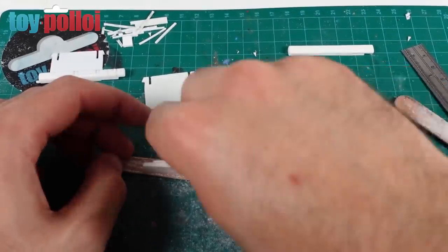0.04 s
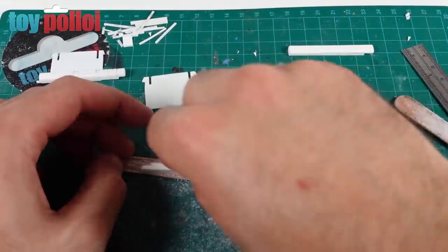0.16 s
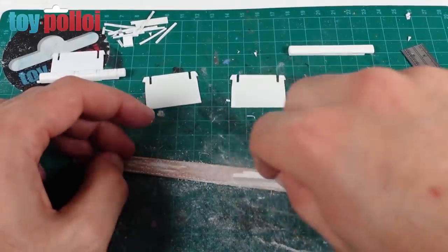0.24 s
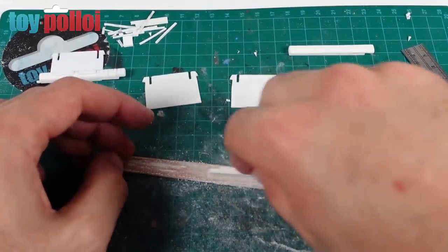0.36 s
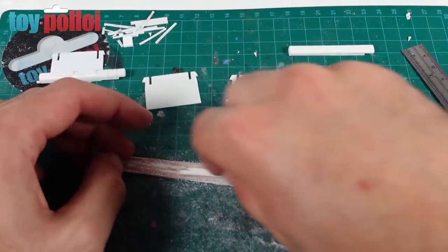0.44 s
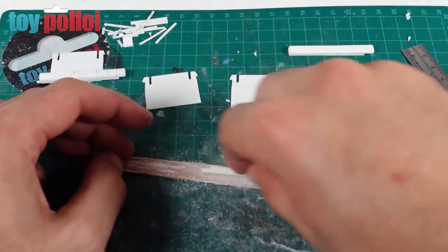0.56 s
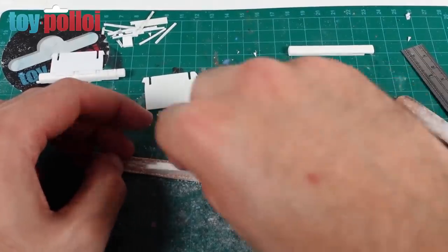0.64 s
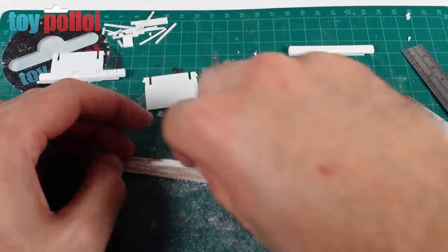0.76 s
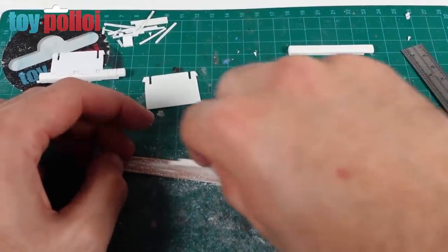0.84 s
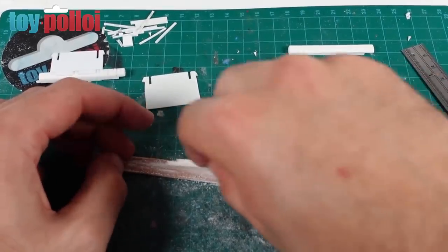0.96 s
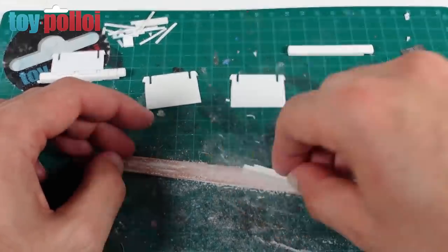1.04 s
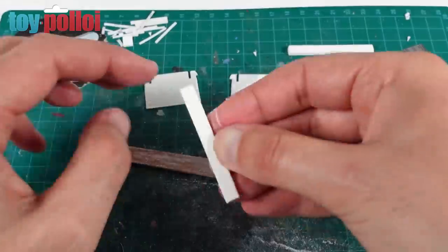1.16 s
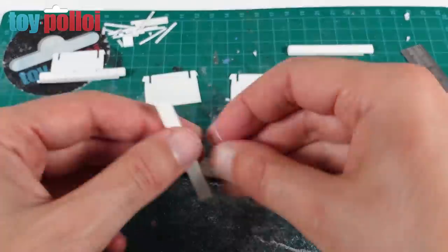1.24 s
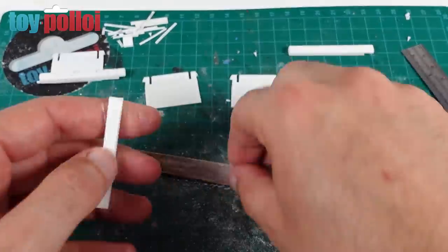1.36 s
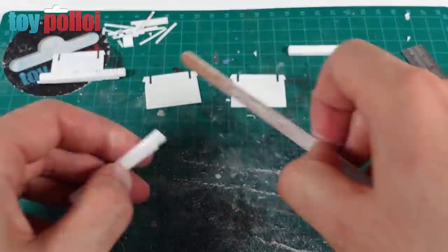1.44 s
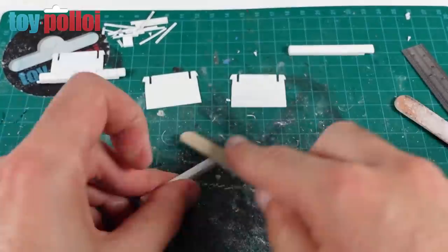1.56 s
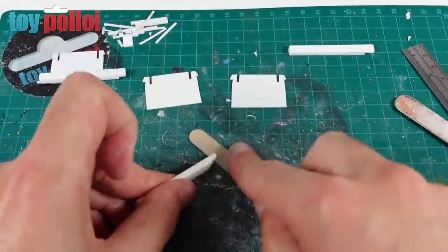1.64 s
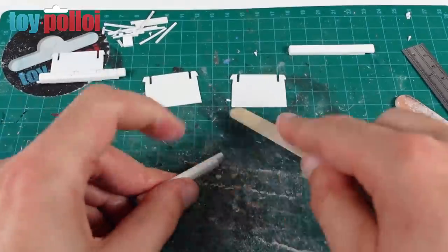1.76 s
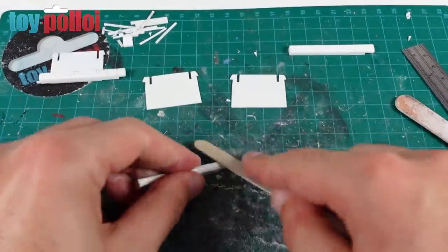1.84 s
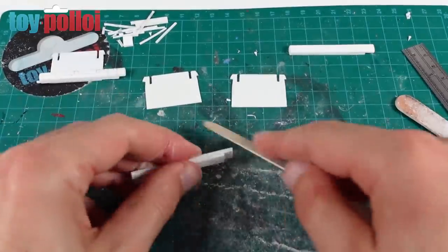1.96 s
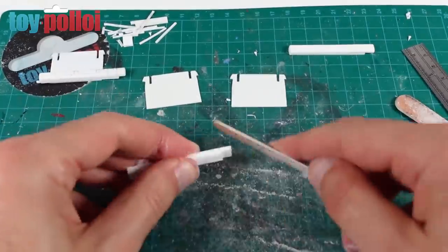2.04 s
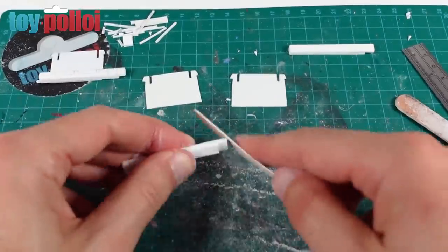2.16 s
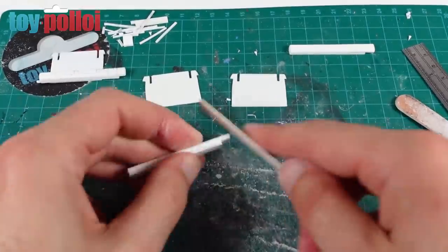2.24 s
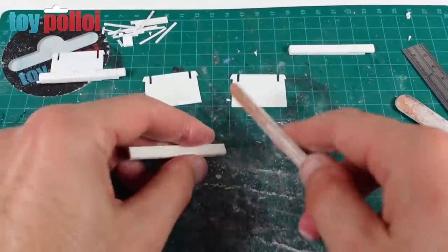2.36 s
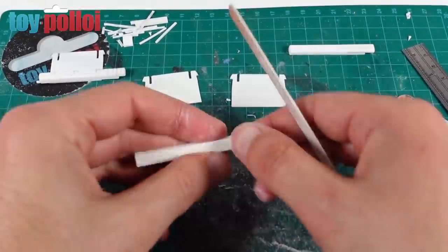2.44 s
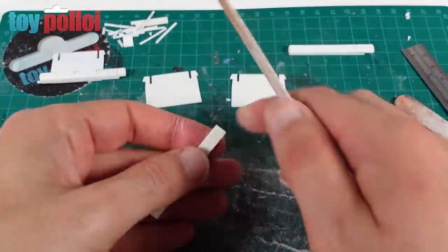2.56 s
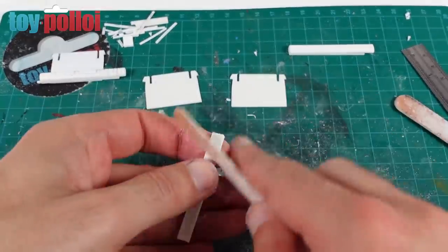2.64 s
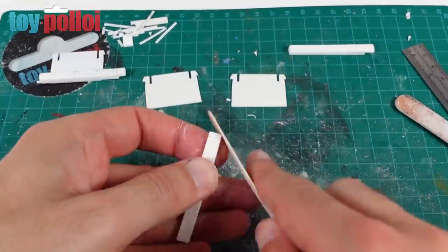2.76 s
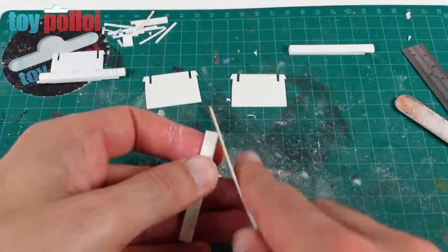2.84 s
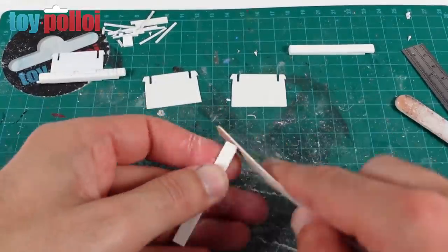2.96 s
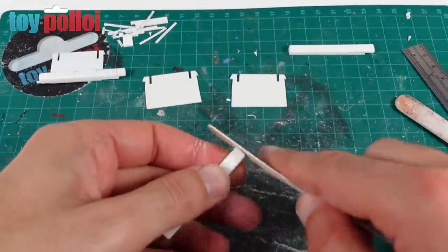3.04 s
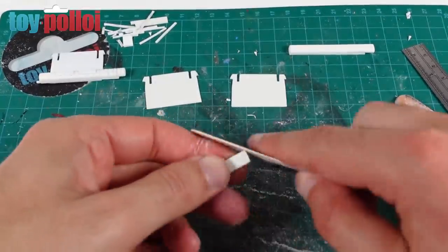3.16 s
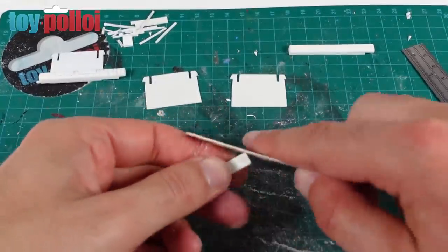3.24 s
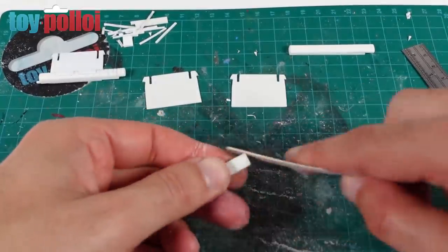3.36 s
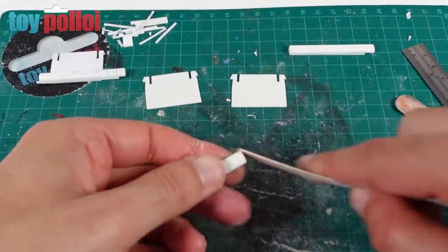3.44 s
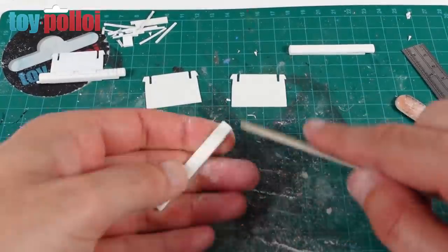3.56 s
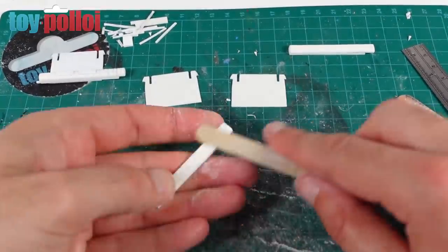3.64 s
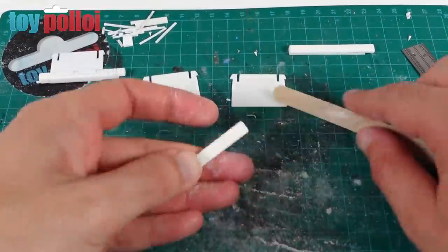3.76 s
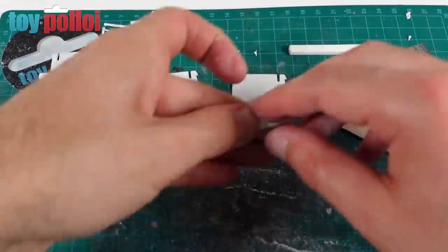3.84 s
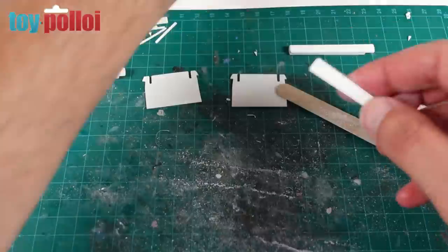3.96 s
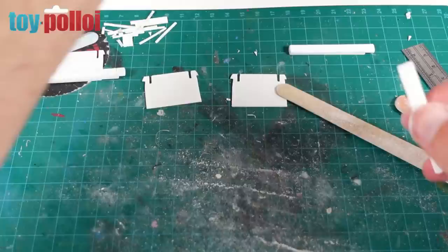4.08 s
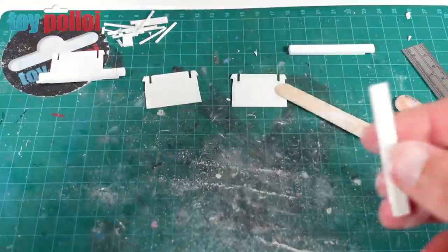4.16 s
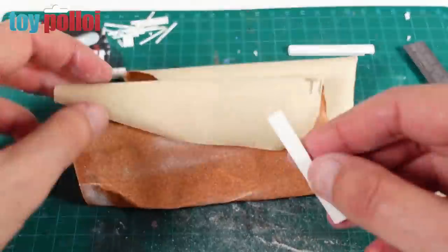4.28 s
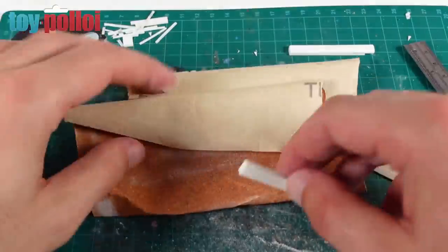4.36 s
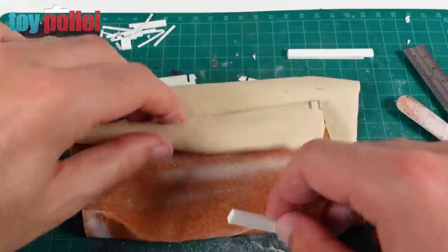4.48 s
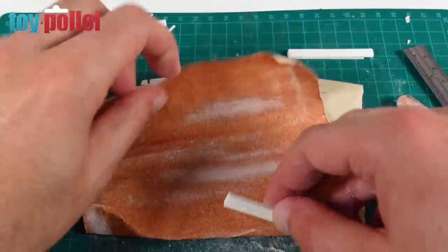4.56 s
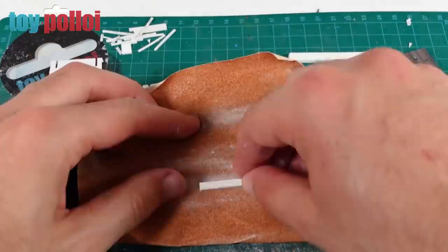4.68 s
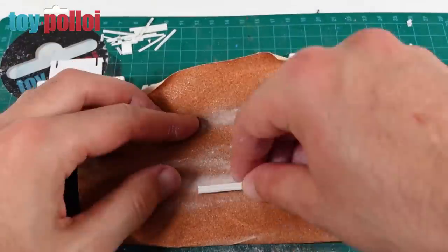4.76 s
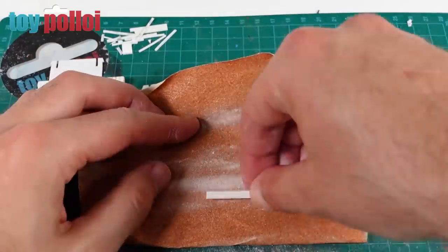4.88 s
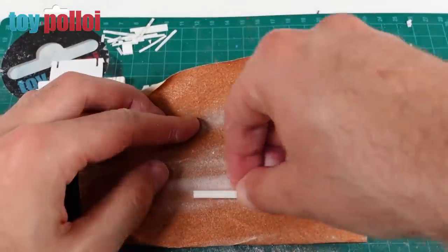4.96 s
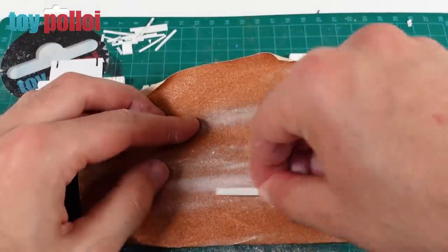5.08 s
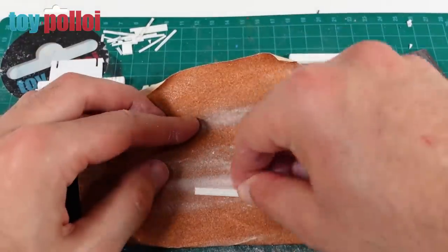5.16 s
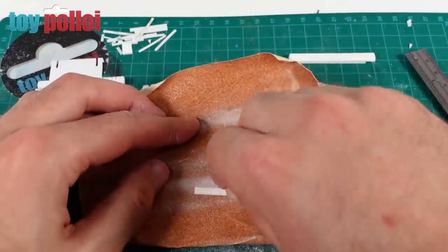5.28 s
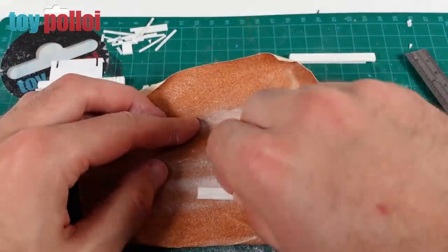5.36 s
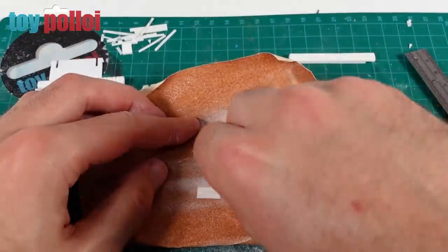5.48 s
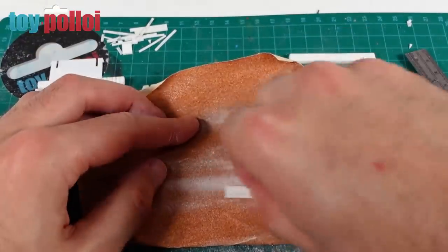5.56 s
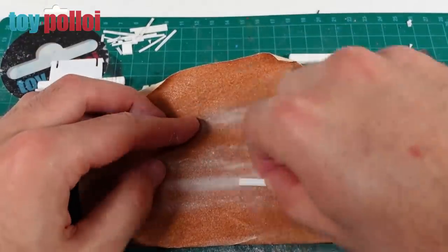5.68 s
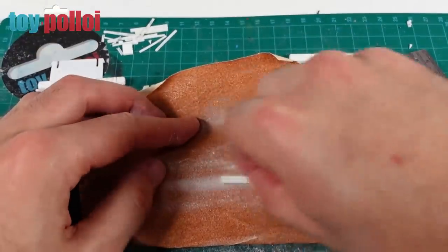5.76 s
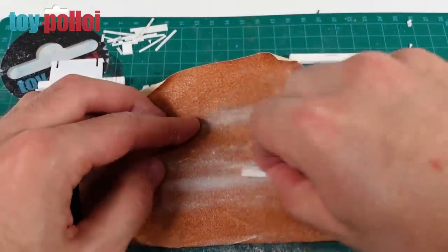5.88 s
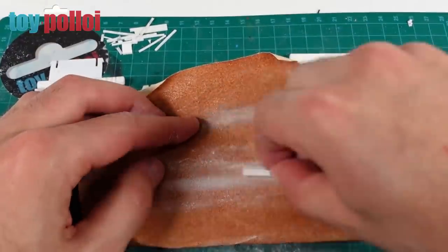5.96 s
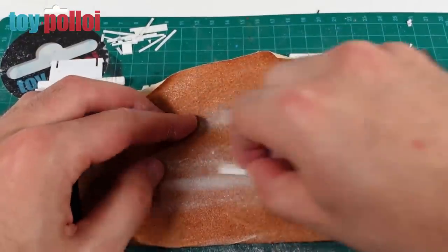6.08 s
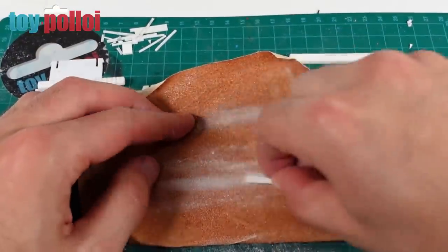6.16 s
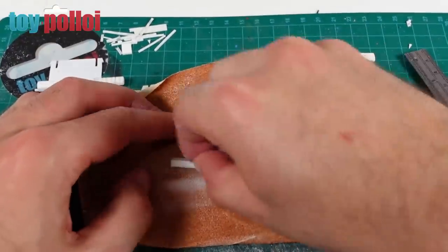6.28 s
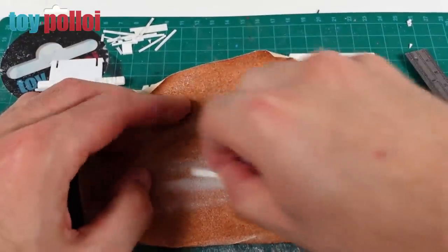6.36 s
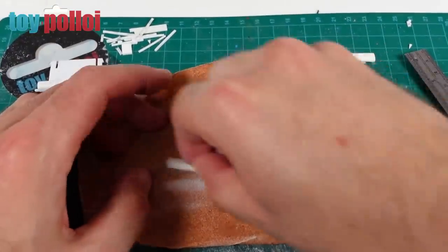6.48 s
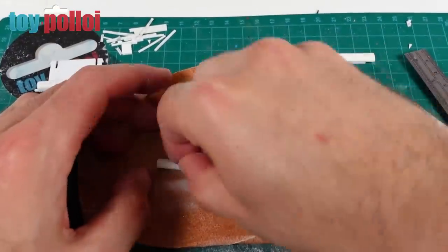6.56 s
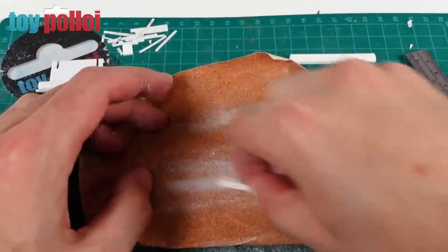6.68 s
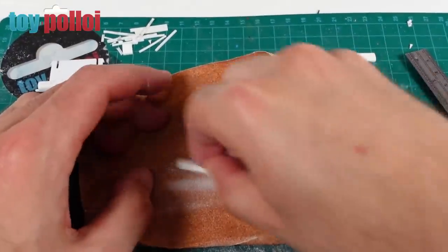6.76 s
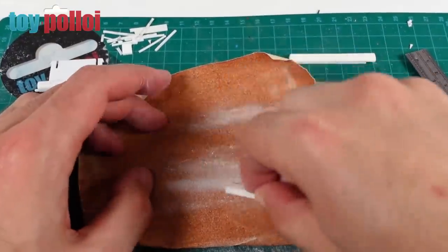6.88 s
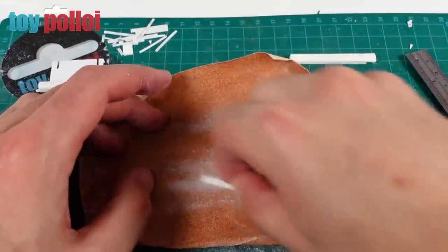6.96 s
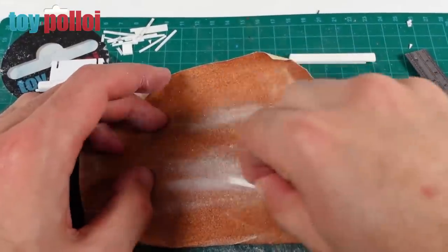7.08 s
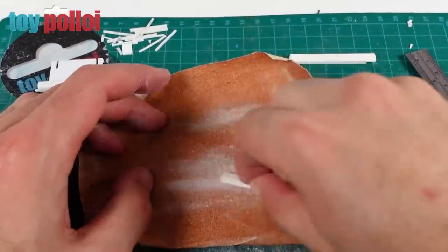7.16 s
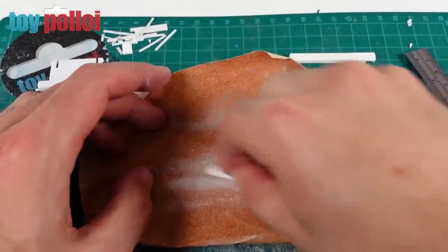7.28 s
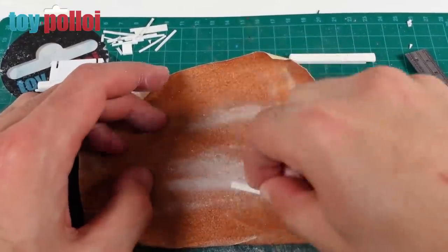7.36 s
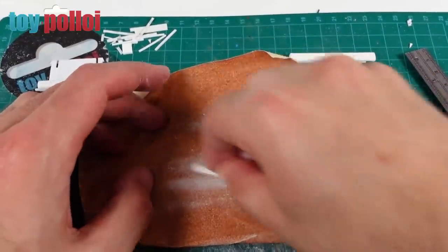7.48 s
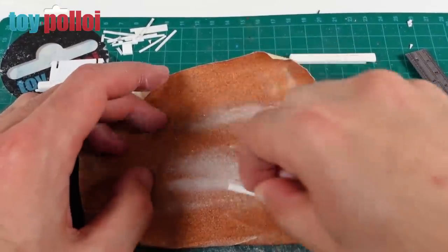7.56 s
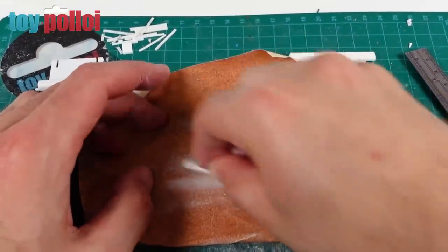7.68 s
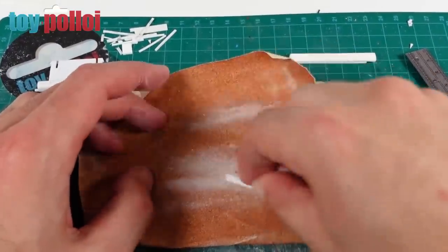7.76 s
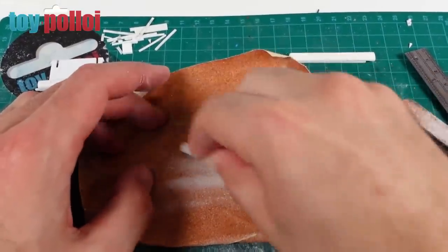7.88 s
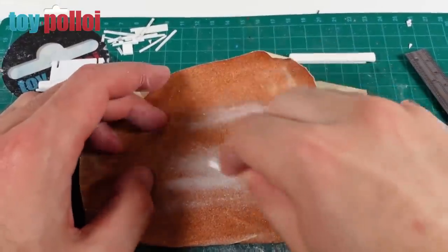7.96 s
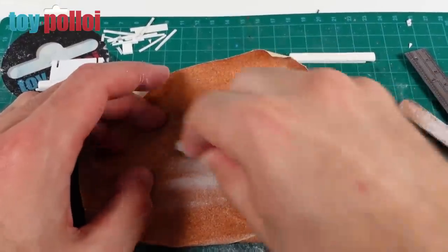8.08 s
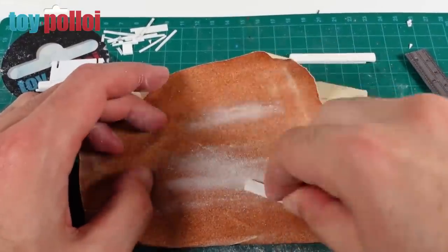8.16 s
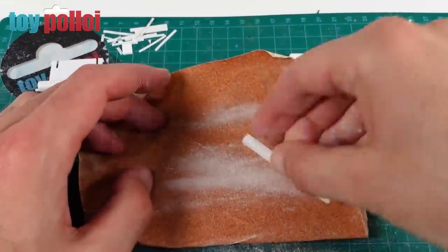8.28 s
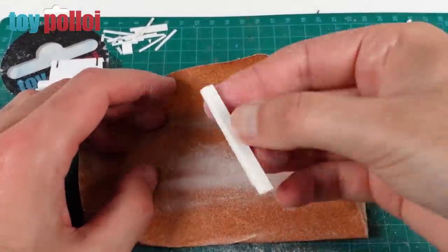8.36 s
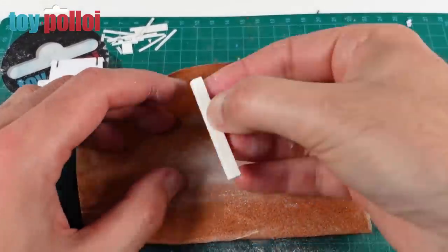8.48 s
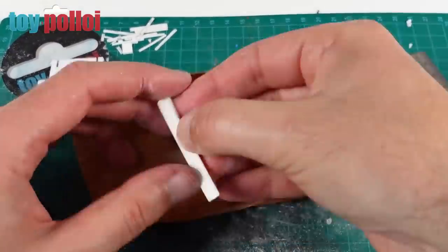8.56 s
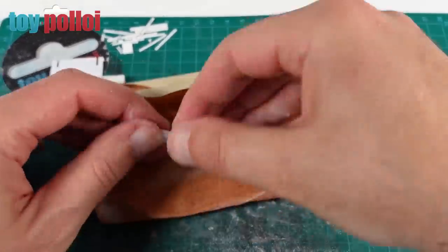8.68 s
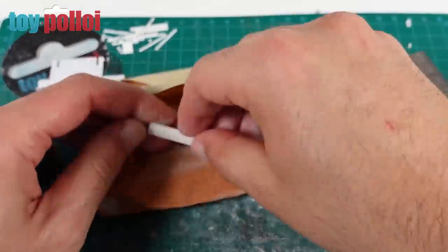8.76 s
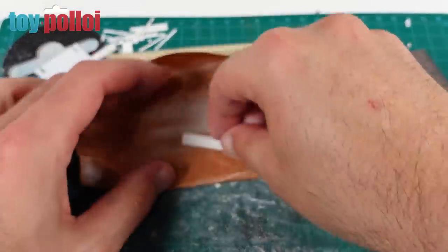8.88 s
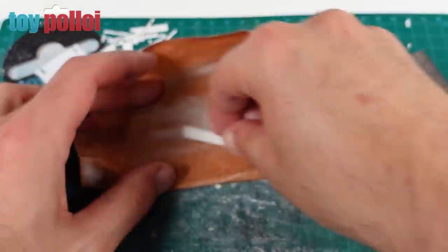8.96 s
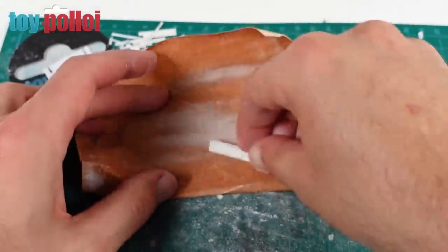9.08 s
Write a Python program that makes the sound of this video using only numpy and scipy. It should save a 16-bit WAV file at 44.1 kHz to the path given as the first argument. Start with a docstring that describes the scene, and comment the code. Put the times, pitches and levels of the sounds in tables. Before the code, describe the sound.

Quick dry sanding rasps, faint nail-file scratches and ticks, snaps of stiff sandpaper, then a long rapid gritty scrubbing in a small room.

```python
"""Small plastic strips are scrubbed on sandpaper by hand, close to the microphone, in a small room.
Before that a strip is rubbed on a sanding stick and trimmed with a nail file.
Every stroke is a hail of tiny grit impacts that follows the hand's speed, coloured by filters.
Pieces and tools tick as they meet and the stiff sheet snaps: short blows, each with a brief ring.
Fingers shift their grip, the file rings when knocked, and faint rumble, hiss and low tones lie behind."""
import sys
import numpy as np
from scipy import signal
from scipy.fft import rfft, irfft
from scipy.io import wavfile

SR = 44100
rng = np.random.default_rng(int(sys.argv[2]) if len(sys.argv) > 2 else 0)


def wrap_up_sound(samples):
    """Save the sound to the file named by the first command line argument, as 16-bit audio."""
    columns = np.atleast_2d(samples).T
    # keep every value between -1 and 1, then stretch to whole-number steps
    tamed = np.clip(columns, -1, 1)
    steps = np.round(tamed * 32767).astype(np.int16)
    wavfile.write(sys.argv[1], SR, steps)


N = 402633  # length of the scene [samples]

# The hand on the sandpaper: a few trial strokes, the long scrub, a fresh start after a look at the edge:
# (time [s], tempo [strokes/s], level [dB], extra bass from pressure [dB], extra treble from speed [dB])
PAPER_TRIAL_HAND = [(4.867, 15, -42, 4, -2), (5.06, 19.7, -33.5, -0.5, 4), (5.19, 22, -35, -0.5, 1.5)]
PAPER_SCRUB_HAND = [(5.575, 18.9, -37.5, -1.5, 6), (5.65, 19.55, -31.3, -0.5, 5), (5.8, 20.95, -31, -1, 2),
                    (6.15, 21.7, -26.3, -3, 0.5), (6.33, 21.9, -27.2, 0, 2.5), (6.52, 22.1, -24.8, -1, 2),
                    (6.66, 22.05, -27.2, 2.5, 3), (7.1, 21.1, -26.4, 1.5, 1.5), (7.6, 20.25, -28.3, 1.8, 2),
                    (8.0, 20.3, -28.2, 0.5, -1.5), (8.2, 19.7, -26.8, 0.5, 2.5)]
PAPER_RESUME_HAND = [(8.925, 18.8, -35, 3.7, 5.4), (9.13, 19.8, -29.5, 5.4, 5.2)]
# the strip skids as it is set down on the sandpaper:
# (time [s], length [s], level [dB], extra bass [dB], extra treble [dB])
PAPER_LANDING_STROKES = [(4.8089, 0.028, -29.5, -4, 1.3), (8.815, 0.036, -26, -4.5, 0.85)]
# colour of rubbing on sandpaper: (frequency [Hz], level [dB])
PAPER_COLOUR = [(50.0, -6), (150.0, -7), (350.0, -9.5), (700.0, -5), (1100.0, -10.5), (1900.0, -3.5),
                (2900.0, -3.5), (4200.0, 0), (5600.0, 0.5), (7500.0, 2), (9500.0, -2.5), (12000.0, -0.7),
                (15500.0, 0)]


def sandpaper():
    """The strip is scrubbed on sandpaper, whose dense grit strikes it all through each stroke."""
    strokes = to_and_fro(PAPER_TRIAL_HAND, contact=0.94)
    strokes += to_and_fro(PAPER_SCRUB_HAND, contact=0.98, lean_db=2.5, settle_s=1.4)
    strokes += to_and_fro(PAPER_RESUME_HAND, contact=0.99)
    strokes += PAPER_LANDING_STROKES
    return rub(strokes, PAPER_COLOUR, ring=1, breakaway=0.12, moving=0.94, sharpness=0.99,
               snags_per_s=1500, snag_db=4, chatter_db=1.87, shift_db=3, rest_db=-28.5)


# The hand with the strip on the flat sanding stick:
# (time [s], tempo [strokes/s], level [dB], extra bass from pressure [dB], extra treble from speed [dB])
STICK_HAND = [(-0.026, 16.7, -39.5, 0.5, 3.5), (0.25, 15.6, -40.5, 2, 5.5), (0.58, 18.3, -40, 3, 4.5),
              (0.75, 18.8, -38, 2, 0.5), (0.95, 17.6, -40.5, 0, 3), (1.09, 13.9, -40, 0, 0)]
# colour of rubbing on the stick: (frequency [Hz], level [dB])
STICK_COLOUR = [(50.0, -2), (150.0, -11.5), (350.0, -9), (700.0, -11), (1100.0, -14.5), (1900.0, -6),
                (2900.0, -8.5), (4200.0, -4.5), (5600.0, -6), (7500.0, -4.5), (9500.0, -6.5), (12000.0, -5),
                (15500.0, -0.5)]


def sanding_stick():
    """The strip is rubbed to and fro on fine grit glued to a flat stick."""
    strokes = to_and_fro(STICK_HAND, contact=0.96, lean_db=1.5, settle_s=0.088)
    return rub(strokes, STICK_COLOUR, ring=0.99, breakaway=0.27, moving=0.93, sharpness=1.,
               snags_per_s=1800, snag_db=4.5, chatter_db=-1.0, shift_db=3, rest_db=-42)


# The hand with the nail file on the hand-held strip, in slow strokes:
# (time [s], tempo [strokes/s], level [dB], extra bass from pressure [dB], extra treble from speed [dB])
FILE_SLOW_HAND = [(1.412, 9.3, -39.5, -2.5, -9), (1.53, 11.15, -50.5, -7, 9), (1.7, 11.9, -53.5, 12.5, 7),
                  (1.87, 11.4, -46, 5, -5), (1.96, 11.6, -46, -1, 4.5), (2.2, 10.6, -48.5, 0, 5),
                  (2.4, 7.8, -56, 7, -5)]


def slow_file_strokes():
    """Slow strokes of the file, with a lift between them."""
    return to_and_fro(FILE_SLOW_HAND, contact=0.38)


# The same hand in quick, light strokes:
# (time [s], tempo [strokes/s], level [dB], extra bass from pressure [dB], extra treble from speed [dB])
FILE_QUICK_HAND = [(2.772, 24, -40.5, -6, -0.98), (2.83, 23.5, -53.5, -8, -1.01), (2.95, 18.5, -44, -2, 1),
                   (3.1, 27, -52, 0, -1.03), (3.27, 23.5, -51.5, 0, 0), (3.5, 23.5, -46, -7, -1)]
# stray touches of the file: (time [s], length [s], level [dB], extra bass [dB], extra treble [dB])
FILE_TOUCH_STROKES = [(1.633, 0.039, -50.5, 8, 6), (2.587, 0.033, -50.5, 2.5, -5),
                      (3.666, 0.067, -56.5, -10, 9), (3.728, 0.038, -48, -23, 6)]
# colour of filing: (frequency [Hz], level [dB])
FILE_COLOUR = [(50.0, 8), (150.0, -21), (350.0, -8), (700.0, -0.5), (1100.0, -4), (1900.0, 3),
               (2900.0, -3.5), (4200.0, -2), (5600.0, -1.5), (7500.0, -1), (9500.0, -2), (12000.0, -1.5),
               (15500.0, -1)]


def nail_file(slow_strokes):
    """The file trims the strip; its few strong snags make a rougher sound."""
    strokes = slow_strokes + to_and_fro(FILE_QUICK_HAND, contact=0.96) + FILE_TOUCH_STROKES
    return rub(strokes, FILE_COLOUR, ring=0.45, breakaway=0.032, moving=0.84, sharpness=0.86,
               snags_per_s=1200, snag_db=14, chatter_db=1.7, shift_db=0.5, rest_db=-26)


# the sheet sliding over the mat and under the fingers:
# (time [s], length [s], level [dB], extra bass [dB], extra treble [dB])
SHEET_STROKES = [(4.04, 0.09, -40.5, -0.5, 0), (4.15, 0.032, -52.5, 6, 6), (4.245, 0.09, -34, 4, 3),
                 (4.355, 0.24, -40, -1, 1), (4.483, 0.044, -25.5, -6, 1), (4.56, 0.174, -35.5, 1, 4.5),
                 (4.625, 0.073, -28, -1.5, 3.5), (8.2, 0.11, -54.5, 9, 3), (8.37, 0.15, -46.5, 3.5, -3),
                 (8.525, 0.097, -44, 2, 6), (8.675, 0.1, -47.5, -1, 0), (8.785, 0.19, -36.5, 1.5, 1)]
# colour of the sliding sheet: (frequency [Hz], level [dB])
SHEET_COLOUR = [(50.0, -34), (150.0, -34), (350.0, -20), (700.0, -4.5), (1100.0, -10), (1900.0, -2.5),
                (2900.0, -7.5), (4200.0, -6), (5600.0, 0.5), (7500.0, -5), (9500.0, -9.5), (12000.0, -12),
                (15500.0, -8.5)]


def sliding_sheet():
    """The sheet of sandpaper is pulled into place, with sparse, strong snags."""
    return rub(SHEET_STROKES, SHEET_COLOUR, ring=0.094, breakaway=0.086, moving=0.88, sharpness=0.4,
               snags_per_s=350, snag_db=16, chatter_db=4.5, shift_db=3.0, rest_db=-10)


# resonances of the strip, hand and worktop: (frequency [Hz], width [Hz], height [dB])
BODY_RESONANCES = [(219, 73, 6.5), (441, 44, 7.5), (582.4, 30, 10.5), (850, 73, 6), (1167, 214, 7),
                   (1552, 233, 9), (2170, 530, 6), (3310, 36, 4), (3920, 20, 2), (5680, 1030, 3),
                   (7180, 116, 2.2), (8200, 363, 3), (11080, 1800, 4.5)]


def rub(strokes, tone, ring, breakaway, moving, sharpness, snags_per_s, snag_db, chatter_db, shift_db, rest_db):
    """Each stroke breaks away, speeds up and slows to the turn; the treble needs the most speed."""
    hz, out = bins(), np.zeros(N)
    colour_db = read(tone, hz)
    for centre_hz, width_hz, height_db in BODY_RESONANCES:
        colour_db = colour_db + ring * height_db / (1 + (2 * (hz - centre_hz) / width_hz) ** 2)
    for s, length, db, bass_db, treble_db in strokes:
        bands = split(grit(snags_per_s, snag_db, chatter_db))
        size = min(round(length * SR), len(bands[0]))
        phase = np.linspace(0, 1, size)
        # half a sine wave, entered partway up; the hand may stop before the stroke ends
        travel = breakaway + (1 - breakaway) * phase / min(moving, 1)
        speed = abs(np.sin(np.pi * np.minimum(travel, 1)))
        drive = np.zeros(size)
        for band, extra_db, power in zip(bands, (bass_db, 0, treble_db), (.55, 1, 1.2)):
            swell = unit(speed ** abs(power * sharpness) + amp(rest_db))
            drive += amp(extra_db) * band[:size] * swell
        drive /= np.std(sum(bands)[:size])
        # the contact point travels along the strip, so the colour changes from end to end of the stroke
        for weight in (1 - phase, phase):
            body = causal(colour_db + shift_db * wander(len(hz), 45.3))
            add(out, s, amp(db) * signal.fftconvolve(drive * weight, body))
        add(out, s, amp(db) * unit(speed) * squeaks(size / SR))
    return out


def to_and_fro(hand, contact, lean_db=0, settle_s=1, uneven_db=0.7):
    """Strokes touch for a share of each beat; as the hand settles in, pushes bear down and pulls ease off."""
    times, tempo, *controls = np.transpose(hand)
    t = np.linspace(times[0], times[-1], SR)
    beats = np.cumsum(np.interp(t, times, tempo)) * (t[1] - t[0])
    turns = np.maximum(np.interp(np.arange(round(beats[-1]) + 1), beats, t), 0)
    strokes = []
    for k, (s, beat_s) in enumerate(zip(turns, np.diff(turns))):
        length = contact * beat_s
        planned = [np.interp(s + length / 2, times, control) for control in controls]
        db, bass_db, treble_db = planned + uneven_db * rng.standard_normal(3)
        settled = min(((s - times[0]) / settle_s) ** 2, 1)
        push_db = (-1) ** k * lean_db * settled
        strokes.append((s, length, db, bass_db + push_db, treble_db))
    return strokes


def grit(snags_per_s, snag_db, chatter_db, chatter_hz=450, size=8192):
    """Countless fine impacts, a few coarse grains that snag, and a chattering contact."""
    fine = rng.standard_normal(size)
    is_snag = rng.random(size) < snags_per_s / SR
    snags = is_snag * np.clip(rng.laplace(size=size), -3, 3)
    chatter = amp(chatter_db * wander(size, chatter_hz * size / SR))
    return (fine + amp(snag_db) * snags) * chatter


def squeaks(length, squeak_db=-7, low_hz=2200, high_hz=7500, cycles=4, count=5):
    """Here and there a coarse grain sticks and slips for a few cycles, each at a pitch of its own."""
    out, t = np.zeros(round(length * SR)), np.arange(SR // 50) / SR
    for when, pitch, force in rng.random((count, 3)):
        turns = t * low_hz * (high_hz / low_hz) ** pitch
        squeak = np.sin(2 * np.pi * turns) * np.exp(-turns / cycles)
        add(out, when * length, 2 * force ** 2 * squeak)
    return amp(squeak_db) * out


# an edge of the strip catches and lets go with a bright tick: (time [s], energy [dB])
CATCH_TICKS = [(1.595, -16), (1.7409, -12), (1.7752, 1), (2.2209, -8), (3.818, -2), (3.8449, -3.5),
               (4.8167, -2), (4.938, -3), (4.9557, 0), (5.051, 0), (5.2133, -14.5), (7.2292, 1.5),
               (8.8345, 3.5), (8.995, 3)]
CATCH_HZ, CATCH_OCTAVES = 15300, 1.2  # centre and spread


def strip_catches():
    """A caught edge springs free with a bright tick."""
    blows = [(s, db, CATCH_HZ, CATCH_OCTAVES) for s, db in CATCH_TICKS]
    return clicks(blows, ring_share=0.75, ring_t60=0.039, crush_s=0.0006)


# strip, file and fingers knock together: (time [s], energy [dB], centre [Hz], spread [octaves])
TAP_BLOWS = [(1.1464, -18.5, 1610, 1.15), (1.6562, -2.5, 7720, 2.1), (1.8734, -13.5, 1650, 0.15),
             (1.9331, -12.5, 559, 1.46), (1.9698, -9.5, 3030, 1.7), (2.3009, -13, 7540, 0.42),
             (2.3556, -17.5, 5780, 1.23), (2.9819, -6.5, 1730, 1.13), (3.5586, -17, 2157, 1),
             (3.981, -21.5, 940, 0.79), (4.091, -1.5, 2050, 1.14), (5.3755, -13.5, 2280, 3.1),
             (8.2258, -8.5, 3500, 0.68), (8.2753, 2, 5240, 0.81), (8.4222, -11.5, 1800, 0.46),
             (8.5944, -10, 1900, 1.4)]


def taps():
    """Strip, file and fingers knock together, each tap with a colour of its own."""
    return clicks(TAP_BLOWS, ring_share=0.71, ring_t60=0.038, crush_s=0.001)


# the strip trips over a coarse grain of the sandpaper: (time [s], energy [dB], centre [Hz])
TRIP_BLOWS = [(6.4079, 0.5, 5850), (6.768, 3.5, 4300), (6.8056, 5, 5600)]
TRIP_OCTAVES = 0.44  # spread


def strip_trips():
    """A coarse grain jolts the strip: mostly blow, little ring."""
    blows = [(*row, TRIP_OCTAVES) for row in TRIP_BLOWS]
    return clicks(blows, ring_share=0.33, ring_t60=0.038, crush_s=0.0004)


# the loose pieces tick lightly between the fingers:
# (time [s], length [s], energy of the strongest ticks [dB])
FIDGET_STRETCHES = [(1.08, 0.35, -23), (2.25, 0.53, -20), (3.1, 0.6, -22.5)]


def light_ticks(slow_strokes, lead_s=0.01, landing_db=-18, landing_hz=2200, landing_octaves=4.3):
    """Loose pieces tick, and the file lands with a soft tap just before each slow stroke."""
    landings = [(s - lead_s, landing_db, landing_hz, landing_octaves) for s, *_ in slow_strokes]
    ticks = scatter(FIDGET_STRETCHES, ticks_per_s=16, range_db=15, centre_hz=4500, octaves=2.6)
    return clicks(landings + ticks, ring_share=0.65, ring_t60=0.022, crush_s=0.00032)


# the stiff sheet snaps as it bends: (time [s], energy [dB], centre [Hz])
SNAP_BLOWS = [(4.239, 6, 2750), (4.2806, -4.7, 2990), (4.4909, 0, 5830), (4.505, 5, 4500),
              (4.5614, -4, 4400), (4.6006, -2, 1200), (4.668, -3, 4680), (8.1488, -4, 1900),
              (8.8947, -6, 4460)]
SNAP_OCTAVES = 0.64  # spread
# the handled sheet crinkles: (time [s], length [s], energy of the strongest ticks [dB])
CRINKLE_STRETCHES = [(4.3, 0.15, -11.5), (8.405, 0.04, -12), (8.86, 0.06, -7)]


def sheet_clicks():
    """The bending sheet gives loud snaps, and small ticks while it crinkles."""
    snaps = [(*row, SNAP_OCTAVES) for row in SNAP_BLOWS]
    crinkles = scatter(CRINKLE_STRETCHES, ticks_per_s=55, range_db=11.5, centre_hz=2190, octaves=1.15)
    return clicks(snaps + crinkles, ring_share=0.66, ring_t60=0.03, crush_s=0.0007)


def clicks(blows, ring_share, ring_t60, crush_s, ripple_db=3, size=2048):
    """A sharp, slightly crumbling blow, then a short dense ring of the light plastic or stiff paper."""
    hz, t, out = bins(), np.arange(size) / SR, np.zeros(N)
    share = np.clip(ring_share, 0, 1)
    for s, db, centre_hz, spread in blows:
        # a bell-shaped hump over octaves, its skirts held at -35 dB
        octaves_away = np.log2((hz + 1) / centre_hz)
        hump_db = np.maximum(-10 / np.log(100) * (octaves_away / spread) ** 2, -35)
        body = causal(hump_db + ripple_db * wander(len(hz), 31.4))
        crush = (t == 0) + .5 * rng.standard_normal(size) * np.exp(-t / crush_s)
        rattle = rng.standard_normal(size) * amp(-60 * t / ring_t60)
        blow = unit(signal.fftconvolve(crush, body)[:size])
        ring = unit(signal.fftconvolve(rattle, body)[:size])
        click = np.sqrt(1 - share) * blow + np.sqrt(share) * ring
        add(out, s, amp(db) * click / np.sqrt(size))
    return out


def scatter(stretches, ticks_per_s, range_db, centre_hz, octaves):
    """Small blows of random time and strength, spread over each stretch."""
    blows = []
    for s, length, db in stretches:
        ticks = rng.random((max(round(ticks_per_s * length), 1), 2))
        for k, (when, weakness) in enumerate(ticks):
            time = s + length * (k + when) / len(ticks)
            blows.append((time, db - range_db * weakness, centre_hz, octaves))
    return blows


# hard knocks on the nail file: (time [s], level [dB])
KNOCKS = [(2.982, -31), (4.092, -36)]
# ringing tones of the nail file: (frequency [Hz], level [dB], time to fade by 60 dB [s])
FILE_RING = [(903, -5.5, 0.077), (1185, -5.5, 0.065), (4430, -5, 0.053), (5110, 7, 0.019)]


def file_knocks():
    """The nail file rings briefly when knocked, as a few fading sine tones."""
    t, out = np.arange(SR // 5) / SR, np.zeros(N)
    ring = sum(amp(db - 60 * t / t60) * np.sin(2 * np.pi * hz * t) for hz, db, t60 in FILE_RING)
    for s, db in KNOCKS:
        add(out, s, amp(db) * ring)
    return out


# fingers shifting their grip on the strip: (time [s], length [s], level [dB])
GRIP_SHIFTS = [(1.06, 0.16, -55), (1.335, 0.12, -55.5), (2.421, 0.26, -65.5), (5.196, 0.37, -59.5)]


def fingers(ticks_per_s=200, tick_db=23, skin_hz=2000, slope_db=5):
    """Dry skin creeps over the plastic in small dull ticks while the grip changes."""
    out = np.zeros(N)
    skin = causal(-slope_db * abs(np.log2((bins() + 1) / skin_hz)))
    for s, length, db in GRIP_SHIFTS:
        creep = grit(ticks_per_s, tick_db, 8.4, chatter_hz=63.4, size=SR)[:round(length * SR)]
        creep = unit(creep * signal.windows.tukey(len(creep), .5))
        add(out, s, amp(db) * signal.fftconvolve(creep, skin))
    return out


def room(x, early_db=-13, tail_db=-21, early_t60=0.041, tail_t60=0.19):
    """Quick scatter from the worktop and hands, then the faint tail of a small room."""
    t = np.arange(SR // 2) / SR
    response = 1. * (t == 0)
    for db, t60, delay in ((early_db, early_t60, .002), (tail_db, tail_t60, .012)):
        echoes = rng.standard_normal(len(t)) * (rng.random(len(t)) < .1)
        echoes = echoes * (t > delay) * amp(-60 * t / t60)
        response = response + amp(db) * echoes / np.linalg.norm(echoes)
    return signal.fftconvolve(x, response / np.linalg.norm(response))[:N]


# colour of the room noise: (frequency [Hz], level [dB])
FLOOR_COLOUR = [(35, -0.5), (200, -1.5), (330, -6), (800, -6), (1700, -10), (3200, -15.5), (6000, -17.5),
                (10000, -20), (15500, -18)]
FLOOR_DB = -54  # level of the room noise
# faint low tones in the background: (time [s], length [s], frequency [Hz], level [dB])
FAINT_TONES = [(3.06, 0.1895, 111, -57), (3.05, 0.55, 186, -60.5), (3.74, 0.22, 188, -54.5)]


def background():
    """Steady rumble and hiss from filtered noise, with a few faint low tones that swell and fade."""
    spectrum = rfft(rng.standard_normal(N)) * amp(read(FLOOR_COLOUR, bins(size=N)))
    out = amp(FLOOR_DB) * unit(irfft(spectrum, N))
    for s, length, hz, db in FAINT_TONES:
        t = np.arange(round(length * SR)) / SR
        swell = np.sin(np.pi * t / length)
        add(out, s, amp(db) * swell * np.sin(2 * np.pi * hz * t))
    return out


def amp(db):
    """Decibels to gain."""
    return 10 ** (np.asarray(db) / 20)


def unit(x):
    """Scales to an rms of one."""
    return x / np.sqrt(np.mean(x ** 2) + 1e-20)


def read(points, hz):
    """Reads a spectrum table on a log-frequency axis."""
    f, value = np.transpose(points)
    return np.interp(np.log(hz + 1), np.log(f + 1), value)


def add(mix, s, sound):
    """Mixes a sound in at time s."""
    part = mix[max(round(s * SR), 0):][:len(sound)]
    part += sound[:len(part)]


def wander(size, steps):
    """A random line of about unit spread, with a new random target at each step."""
    knots = rng.standard_normal(1024)
    return np.interp(np.linspace(0, steps, size), np.arange(len(knots)), knots)


def causal(db, size=4096):
    """The impulse response, of unit energy, that rings after the blow with the given spectrum."""
    log_gain = np.log(amp(np.maximum(db - db.max(), -80)))
    circle = np.r_[log_gain, log_gain[-2:0:-1]]
    # the Hilbert transform gives the phase that puts the energy as early as possible
    response = np.fft.ifft(np.exp(np.conj(signal.hilbert(circle)))).real[:size // 2]
    return response / np.linalg.norm(response)


def bins(size=4096):
    """Frequencies of a spectrum."""
    return np.fft.rfftfreq(size, 1 / SR)


def split(x, low_hz=2800, high_hz=9000):
    """Parts a sound into bass, middle and treble."""
    hz, z = bins(size=2 * len(x)), rfft(x, 2 * len(x))
    bass = 1 / (1 + (hz / low_hz) ** 8)
    treble = 1 - 1 / (1 + (hz / high_hz) ** 8)
    return [irfft(z * share)[:len(x)] for share in (bass, 1 - bass - treble, treble)]


def scene():
    """Stick, file, sheet and sandpaper, with their clicks, in the room."""
    slow_strokes = slow_file_strokes()
    rubbing = sandpaper() + sanding_stick() + nail_file(slow_strokes) + sliding_sheet()
    plastic_clicks = strip_catches() + taps() + strip_trips() + light_ticks(slow_strokes)
    handling = plastic_clicks + sheet_clicks() + file_knocks() + fingers()
    return (room(rubbing + handling) + background())[None]


EDGE_HZ = 15900  # top of the recorder's band


def record(dry):
    """The recorder's band limit, a low-pass filter."""
    low_pass = signal.firwin(511, EDGE_HZ, window=("kaiser", 9), fs=SR)
    return signal.oaconvolve(dry, low_pass[None], "same")


dry = scene()
out = record(dry)
wrap_up_sound(out)
```